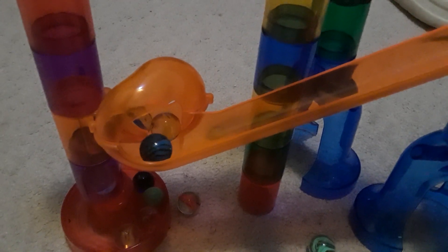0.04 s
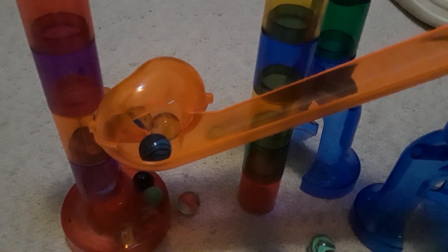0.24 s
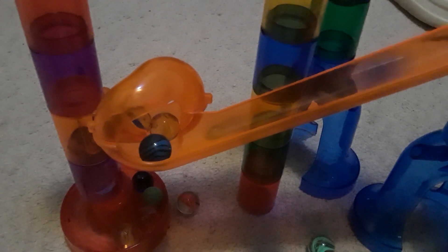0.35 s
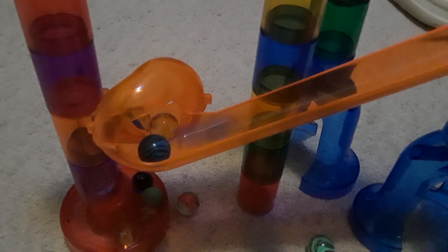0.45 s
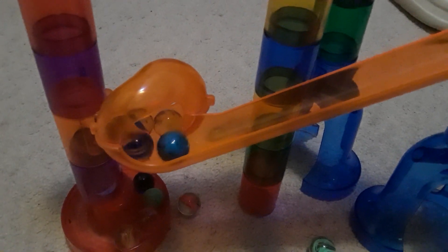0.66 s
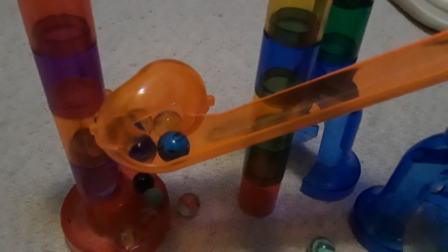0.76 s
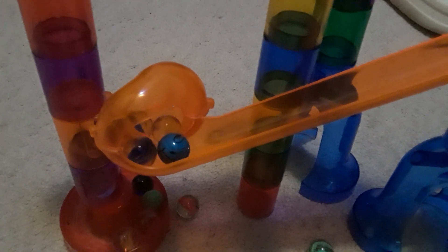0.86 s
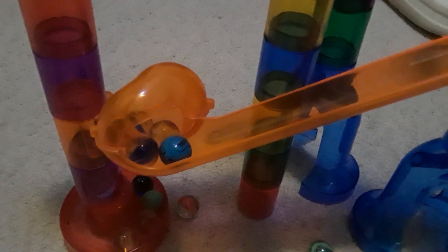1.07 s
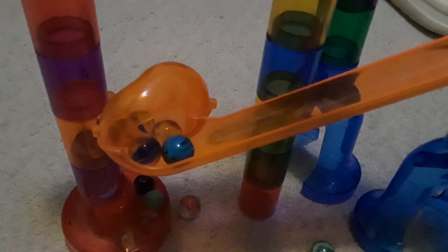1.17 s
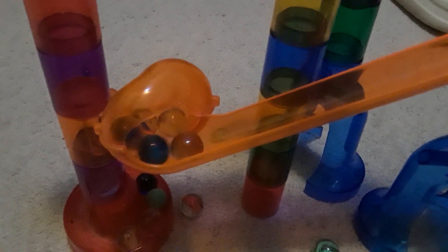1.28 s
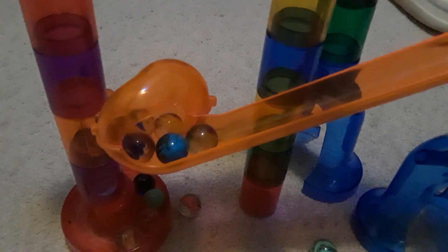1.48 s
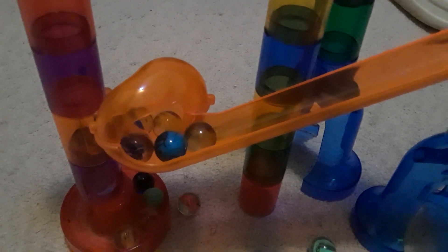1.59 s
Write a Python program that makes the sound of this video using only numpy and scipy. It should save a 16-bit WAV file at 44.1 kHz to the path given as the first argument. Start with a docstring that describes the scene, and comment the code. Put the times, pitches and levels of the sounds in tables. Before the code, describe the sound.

Glass marbles clack in quick clusters as they drop into a plastic cup on a marble run, rolling and bouncing between three landings. They settle with small glassy ticks, heard close by in a small room with a faint hum.

```python
"""Glass marbles drop into the plastic cup of a marble run, close by in a small room.
From the start, over a low room hum, marbles roll on the chute and hop softly on the plastic.
Then they bounce off the cup's wall in quick clacks, and two land with a thump (0.33 s, 0.53 s).
More rolling and clacks lead to a third landing (1.26 s). At the end the marbles settle,
touching each other with small glassy ticks."""
import sys
import numpy as np
from scipy import signal
from scipy.fft import rfft, irfft
from scipy.io import wavfile
from scipy.ndimage import uniform_filter1d

SR = 44100
rng = np.random.default_rng(int(sys.argv[2]) if len(sys.argv) > 2 else 0)


def unload_wav(signal):
    """Save mono or channel-first audio to the path in sys.argv[1] as 16-bit WAV at rate SR, clipped to [-1, 1]."""
    wavfile.write(
        sys.argv[1],
        SR,
        np.round(np.clip(np.atleast_2d(signal).T, -1, 1) * 32767).astype(np.int16),
    )


N = 72765
HZ = np.fft.rfftfreq(4096, 1 / SR)  # frequencies at which filters are set
T = np.arange(SR // 4) / SR  # time within one hit [s]
RISE_S, SNAP_RISE_S = 0.00039, 0.00012  # how fast a normal hit and a sharp hit swell
RING_SPREAD = 0.024  # how far ring pitches stray, as a fraction
TOP_HZ = 16000

# A hit on the plastic wall as heard, with a dip near 10 kHz: (frequency [Hz], gain [dB])
WALL_TONE = [(60, -28.5), (180, -12), (600, -9.5), (1300, -2), (2200, 4.5), (3000, 6), (4500, -1.5),
             (5800, -5), (8000, -6.5), (9600, -20.5), (11300, -19), (15500, -25.5)]


def amp(db):
    """Turns decibels into a gain."""
    return 10 ** (np.asarray(db) / 20)


def unit_level(x):
    """Scales a sound to an average (rms) level of 1."""
    return x / np.sqrt(np.mean(x ** 2) + 1e-20)


def curve(points, hz=HZ):
    """Joins (frequency, value) points on a log-frequency axis."""
    freqs, values = np.transpose(points)
    return np.interp(np.log(hz + 1), np.log(freqs + 1), values)


def add(mix, start_s, sound):
    """Mixes a stereo sound in at its start time."""
    part = mix[:, max(round(start_s * SR), 0):][:, :sound.shape[1]]
    part += sound[:, :part.shape[1]]


def pan(db):
    """Left and right gains that make the left side db louder."""
    return amp(np.array([[.5], [-.5]]) * db)


def fade(t60):
    """Dies away by 60 dB in t60 seconds."""
    return np.exp(-np.log(1000) * T / t60)


def colour(x, db):
    """Changes the tone by the gains db at the frequencies HZ, with no ringing ahead of a hit."""
    log_gain = np.log(amp(np.r_[db, db[-2:0:-1]]))
    taps = np.fft.ifft(np.exp(signal.hilbert(log_gain).conj())).real[:len(HZ)]
    return signal.fftconvolve(x, taps[None], axes=1)[:, :x.shape[1]]


def stereo_noise(size, likeness=0.49):
    """Noise that is partly alike on the left and right."""
    left, other = rng.standard_normal((2, size))
    return np.array([left, likeness * left + np.sqrt(1 - likeness ** 2) * other])


def burst(t60, rise_s):
    """A struck shell rings at so many pitches at once that it sounds like a puff of noise."""
    spectrum = rfft(stereo_noise(len(T)) * (1 - np.exp(-T / rise_s)) * fade(t60))
    power = uniform_filter1d(abs(spectrum) ** 2, size=250, axis=1)
    flat = irfft(spectrum / np.sqrt(power + 1e-12), len(T))
    puff = flat * (T < t60 * 2) * (T < T[-1] / 2)
    return puff / np.linalg.norm(puff, axis=1, keepdims=True)


def ping(hz, t60, rise_s=0.00069):
    """One pitch that swells briefly after a hit and dies away."""
    return np.sin(2 * np.pi * (hz * T + rng.random())) * fade(t60) * (1 - np.exp(-T / rise_s))


def room_hum(hum_hz=113.6):
    """Steady room noise with a low hum."""
    # The noise as heard, with a dip near 10 kHz from audio coding: (frequency [Hz], gain [dB])
    heard_tone = [(20, -23.5), (45, -28), (80, -4), (115, 1.5), (170, 1.5), (300, -8), (700, -8.5),
                  (1500, -11), (4000, -34), (8000, -33.5), (10000, -50), (16000, -44.5)]
    noise = unit_level(colour(stereo_noise(N), curve(heard_tone)))
    hum = np.sqrt(2) * np.sin(2 * np.pi * hum_hz * np.arange(N) / SR)
    return amp(-54) * noise + amp(-61.5) * hum


def rolling():
    """Tiny bumps under the marbles sound through the chute; rarer skips make it chatter."""
    # Loudness of the rolling: (time [s], level [dB])
    roll_levels = [(0, -54), (.2, -53), (.36, -78), (0.439, -43.5), (.52, -40), (.59, -36), (.64, -48.5),
                   (.76, -41.5), (.80, -78), (.87, -50.5), (.95, -56), (1.1, -45.5), (1.18, -44),
                   (1.25, -42.5), (1.4, -44), (1.47, -64), (1.65, -55)]
    # The rolling as heard, with a dip near 10 kHz from audio coding: (frequency [Hz], gain [dB])
    heard_tone = [(60, -23), (200, 0), (500, -9), (720, 9), (1100, 4.5), (2000, 7), (2700, 4.5), (3400, -4),
                  (5000, -5), (8000, -15.5), (9800, -35), (16000, -26)]
    bumps_per_s, skips_per_s = 2100, 200
    chatter_hz, chatter_width_hz = 2720, 240
    dull_hz, fast_roll_db = 4000, -42.5
    strength = amp(3 * np.minimum(rng.exponential(1, N), 4))
    bumps = rng.random(N) < bumps_per_s / SR
    skips = rng.random(N) < skips_per_s / SR
    ring = np.sin(2 * np.pi * chatter_hz * T) * np.exp(-np.pi * chatter_width_hz * T)
    chatter = amp(-7) * unit_level(signal.fftconvolve(skips * strength, ring)[:N])
    level_db = np.interp(np.arange(N) / SR, *np.transpose(roll_levels))
    wobble_db = 1.5 * unit_level(uniform_filter1d(rng.standard_normal(N), round(0.014 * SR)))
    bright = unit_level(colour(stereo_noise(N) * bumps * strength, curve(heard_tone))) + chatter
    dull = signal.sosfiltfilt(signal.butter(2, dull_hz, fs=SR, output="sos"), bright)
    speed = np.minimum(amp(level_db - fast_roll_db), 1)  # slow rolling is quieter and duller
    return amp(level_db + wobble_db) * (dull + speed * (bright - dull))


def hop(db):
    """A marble hops on the plastic: a gentle clack that is duller the softer it is."""
    detune = 1 + RING_SPREAD * rng.standard_normal()
    knock = clack(db, snap_db=-3, ring_db=5, ring_hz=2760 * detune, upper_hz=3900 * detune,
                  chute_db=-1, side_db=-2.5)
    cutoff_hz = min(15300 * 2 ** (db / 32.5), TOP_HZ)  # an octave lower for each 32.5 dB softer
    return signal.sosfilt(signal.butter(2, cutoff_hz, fs=SR, output="sos"), knock)


def cup():
    """The cup rings at its own pitches, struck at a slightly different spot each time."""
    # The cup's natural pitches: (frequency [Hz], level [dB], time to fade by 60 dB [s])
    cup_pitches = [(992, -12.5, 0.053), (1345, -6.5, 0.053), (1689, -5.5, 0.032), (2070, -3.5, 0.036),
                   (2674, -9, 0.072), (3260, -9, 0.057), (4295, -12, 0.024), (4815, -2.5, 0.023),
                   (6350, -6, 0.014), (7780, -6.5, 0.02)]
    ring = np.zeros(len(T))
    for hz, db, t60 in cup_pitches:
        louder, higher, phase = rng.standard_normal(3)
        wave = np.sin(2 * np.pi * (hz * (1 + 0.011 * higher) * T + phase))
        ring += amp(db + 2 * louder) * fade(t60) * wave
    return ring * (1 - np.exp(-T / RISE_S))


def clack(db, snap_db, ring_db, ring_hz, upper_hz, chute_db, side_db):
    """A marble hits the wall: the contact snaps, the plastic cracks, and the cup and chute ring."""
    split_hz, chute_hz = 5900, 691
    treble = ((HZ + 1) / split_hz) ** 6  # the crack lies below the split, the snap above it
    crack_tone = curve(WALL_TONE) - 10 * np.log10(1 + treble)
    snap_tone = curve(WALL_TONE) - 10 * np.log10(1 + 1 / (treble + 1e-4))
    crack = amp(33) * colour(burst(t60=0.022, rise_s=RISE_S), crack_tone)
    snap = amp(40 + snap_db) * colour(burst(t60=0.013, rise_s=SNAP_RISE_S), snap_tone)
    hollow_ring = amp(13.5 + ring_db) * ping(ring_hz, t60=0.022)
    # Two close pitches beat against each other.
    close_pair = sum(ping(upper_hz * (1 + sign * RING_SPREAD), t60=0.02) for sign in (-1, 1))
    upper_ring = amp(5) * close_pair / np.sqrt(2)
    chute = amp(chute_db) * ping(chute_hz * (1 + 0.026 * rng.standard_normal()), t60=0.034)
    return amp(db) * pan(side_db) * (crack + snap + cup() + hollow_ring + upper_ring + chute)


def landing(db, thump_db, side_db):
    """A marble drops into the cup with a hard crack and a low thump, and the whole tower shakes."""
    # A landing as heard, with a dip near 10 kHz: (frequency [Hz], gain [dB])
    heard_tone = [(40, -22), (130, -22), (600, -7), (1300, -2.5), (2200, 4), (3000, 9.5), (3600, -2),
                  (4900, 6), (6000, -4), (7900, 1.5), (9800, -16), (13000, -10), (15500, -17)]
    hit = burst(t60=0.017, rise_s=SNAP_RISE_S)
    shake = amp(-6.5) * burst(t60=0.17, rise_s=RISE_S)
    crack = amp(35) * colour(hit + shake, curve(heard_tone))
    thump_band = signal.butter(2, [115, 1120], "band", fs=SR, output="sos")
    thump = signal.sosfilt(thump_band, 1. * (T == 0))  # the low part of a single click
    return pan(side_db) * (amp(db) * (crack + cup()) + amp(thump_db) * thump)


def tick(db):
    """Two marbles touch with a tiny, bright sound."""
    # Glass on glass as heard: (frequency [Hz], gain [dB])
    heard_tone = [(100, -20), (1000, -28), (3000, -4), (5500, -2), (8000, 3.5), (9800, -6), (15500, -11.5)]
    return amp(db + 31) * colour(burst(t60=0.012, rise_s=SNAP_RISE_S), curve(heard_tone))


def room(sound):
    """Adds early echoes from the floor and the towers, then the fading tail of a small room."""
    # How long the room rings: (frequency [Hz], time to fade by 60 dB [s])
    fade_times = [(100, 0.03), (700, 0.18), (3000, 0.32), (8000, 0.4578), (15000, 1.45)]
    # Tone of the tail: (frequency [Hz], gain [dB])
    tail_tone = [(100, -12), (700, 7), (3000, -4.5), (8000, -8.5), (15000, -24)]
    echoes_per_s, first_echo_s, floor_echo_s = 4000, 0.003, 0.0045
    echoes = rng.standard_normal((2, SR // 2)) * (rng.random((2, SR // 2)) < echoes_per_s / SR)
    hz, t, bands = signal.stft(echoes, SR, nperseg=256)
    decay = np.exp(-np.log(1000) * t / curve(fade_times, hz)[:, None])
    _, tail = signal.istft(bands * decay, SR, nperseg=256)
    tail = amp(-12) * colour(tail / np.linalg.norm(tail, axis=1, keepdims=True), curve(tail_tone))
    add(tail, 0, amp(-11.5) * burst(t60=0.079, rise_s=RISE_S))  # early echoes
    floor_tone = curve(WALL_TONE) - curve(WALL_TONE).max()
    heard = np.zeros((2, N))
    add(heard, 0, sound)
    add(heard, first_echo_s, signal.fftconvolve(sound, tail, axes=1))
    add(heard, floor_echo_s, amp(-15) * colour(sound, floor_tone))
    return heard


def scene():
    """Over the rolling and the hum, every hit rings out into the room."""
    # Soft hops on the plastic: (time [s], relative level [dB])
    hops = [(.087, -53), (.124, -51), (.198, -53), (.305, -44), (.4368, -51), (.5775, -40), (.583, -38),
            (.592, -40), (.6022, -36.5), (.7273, -35.5), (.9195, -47.5), (1.0645, -40.5), (1.3615, -31)]
    # Hits on the cup's wall: (time [s], relative level [dB], snap gain [dB], ring gain [dB],
    # ring pitch [Hz], upper ring pitch [Hz], chute gain [dB], left minus right [dB])
    clacks = [(0.2386, -24.5, -16, 2.5, 2683, 3660, -11, -6.5),
              (0.2471, -26.5, -8, -10, 2760, 3800, -5, -1), (0.2702, -32, -6, -15, 2680, 4300, -5, -5.5),
              (0.2854, -23.5, -2, 3.5, 2830, 4000, -22, -1), (0.3472, -22.5, -4.5, 0, 3000, 3800, -12, 2),
              (0.3827, -26.5, -3, -17, 3450, 5080, -7.5, 4), (0.3979, -33.5, -7, -15, 2920, 3900, -3, -0.5),
              (0.5603, -29, -1.5, -3, 2830, 4010, -11, 1.5), (0.5728, -39, 6.5, 4, 2930, 4320, -8, -5),
              (0.6239, -28, -4, 9, 2820, 4560, 0, -1.5), (0.6602, -24.5, -11, -14, 3000, 4180, -2.5, 0.5),
              (0.6739, -16.5, -7.5, -1.5, 2707, 4200, -12, 0.5),
              (0.7081, -23.5, -1.5, -2.5, 2995, 4910, -5.5, 0.5),
              (0.7473, -32.5, -1.5, -5, 2900, 4500, -6.5, -2.5),
              (0.7704, -39, -1.5, -11, 2850, 4360, -3, -3.5), (0.9637, -27, -8, 5.5, 2693, 3660, -6, -5),
              (0.9756, -24, -6.5, 2.5, 2740, 3950, -25, -2), (0.9977, -31, -11, -1, 2730, 4140, 6, -6),
              (1.0058, -23.5, -1, 5, 2747, 4110, -11, 0.5), (1.0246, -32.5, -1.5, 0, 2510, 3900, -12, -5),
              (1.0532, -25.5, 3, -3, 2675, 4600, -20, 0.5),
              (1.0754, -34.5, -4, -7.5, 2690, 4350, -10, -4.5),
              (1.09, -36.5, -7, -18, 2720, 4340, -10, 4.5), (1.2932, -27, -11, -2, 2730, 3700, -5, 0),
              (1.3324, -36, -1, -10, 2980, 4350, 0, 4), (1.3396, -22.5, 0, -1.5, 2970, 4320, -16, -5.5),
              (1.3481, -23, -4.5, -0.5, 2890, 3630, -1, -0.5), (1.3771, -30.5, 1.5, -5, 3050, 4320, -4, -6),
              (1.39, -36.5, -2.5, 2.5, 2880, 4470, -6, 6.5)]
    # Drops from the tower: (time [s], crack and cup gain [dB], thump gain [dB], left minus right [dB])
    landings = [(.3335, -26.5, 8.5, -6), (.5276, -24, 13, -4), (1.2565, -23, 15.5, -2)]
    # Glass touching glass: (time [s], relative level [dB])
    ticks = [(.941, -57), (1.1265, -40), (1.1565, -48), (1.5195, -47.5), (1.528, -54), (1.569, -58.5),
             (1.5957, -41), (1.6035, -50), (1.609, -43), (1.616, -45.5)]
    mix = rolling() + room_hum()
    for events, source in ((hops, hop), (clacks, clack), (landings, landing), (ticks, tick)):
        for start_s, *settings in events:
            add(mix, start_s, room(source(*settings)))
    return mix


def record(dry):
    """Two microphones differ in tone, the left one farther away; overloads and top treble are cut."""
    # Tone difference of the microphones: (frequency [Hz], left minus right [dB])
    mic_difference = [(60, -2), (350, 0), (700, -3.5), (1300, -2.5), (2200, 0.5), (3200, -6.5), (4500, 8),
                      (6400, 7.5), (7800, 0.5), (8800, -6), (10500, 3), (16000, 6)]
    left_delay_s = 0.0002681
    left = colour(dry[:1], curve(mic_difference) / 2)[0]
    right = colour(dry[1:], -curve(mic_difference) / 2)[0]
    samples = np.arange(N)
    late_left = np.interp(samples - round(left_delay_s * SR), samples, left)
    clipped = np.clip([late_left, right], -1, 1)
    low_pass = signal.firwin(255, TOP_HZ, window=("kaiser", 9), fs=SR)
    return signal.oaconvolve(clipped, low_pass[None], "same")


dry = scene()
out = record(dry)
unload_wav(out)
```